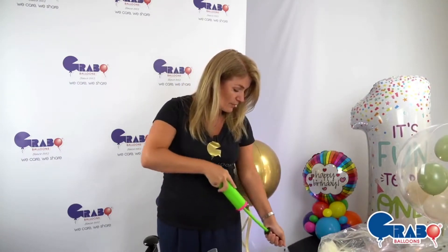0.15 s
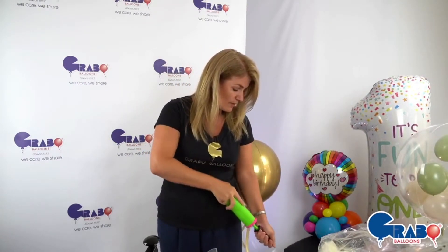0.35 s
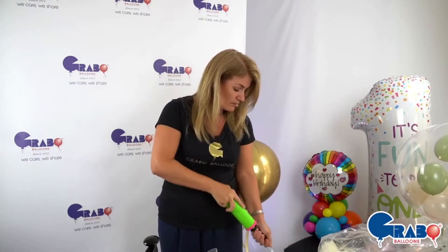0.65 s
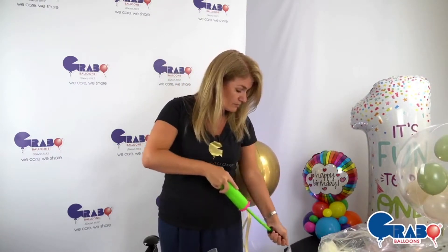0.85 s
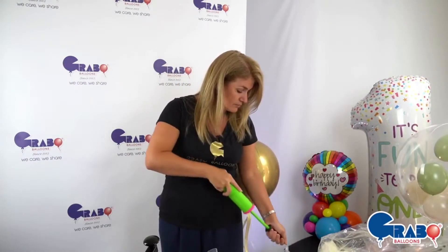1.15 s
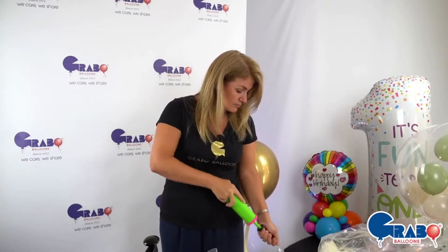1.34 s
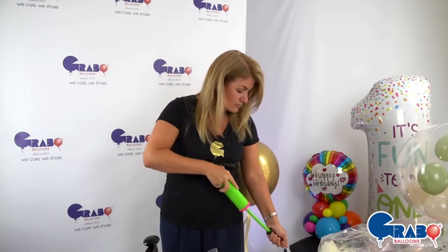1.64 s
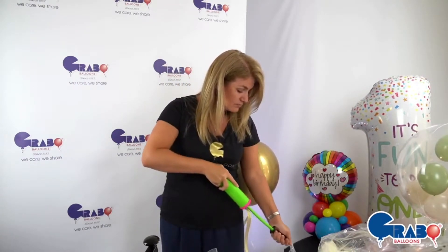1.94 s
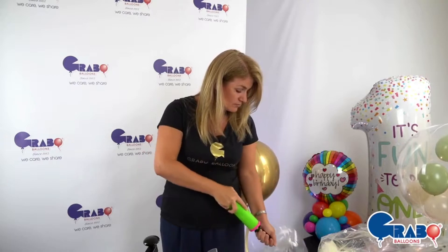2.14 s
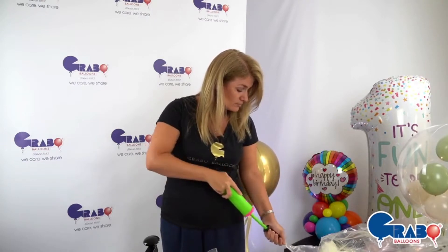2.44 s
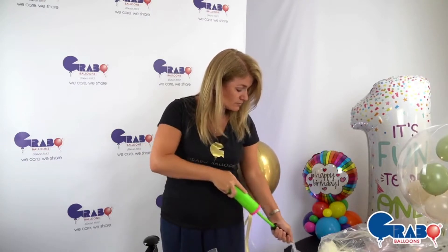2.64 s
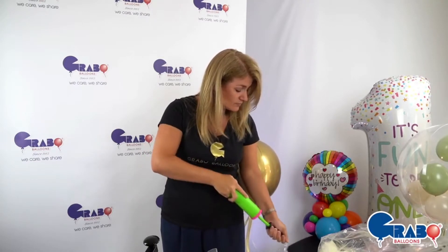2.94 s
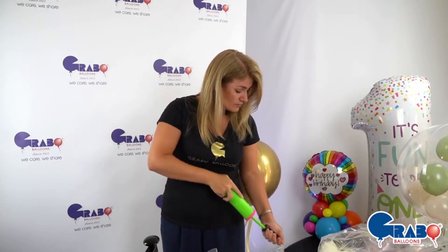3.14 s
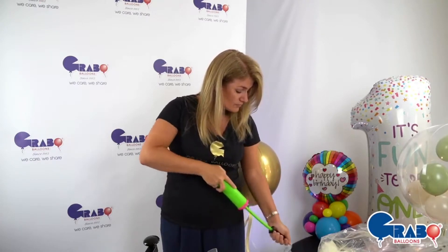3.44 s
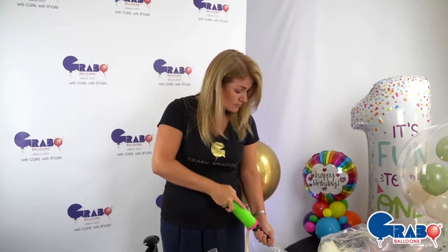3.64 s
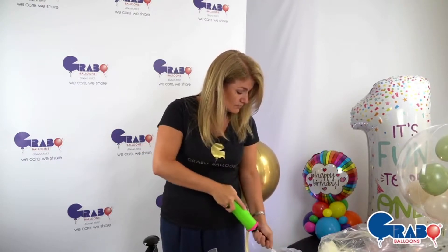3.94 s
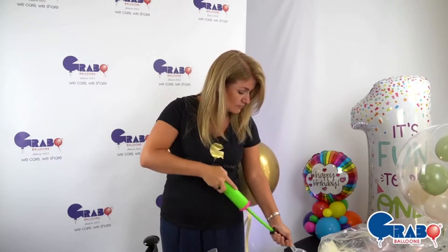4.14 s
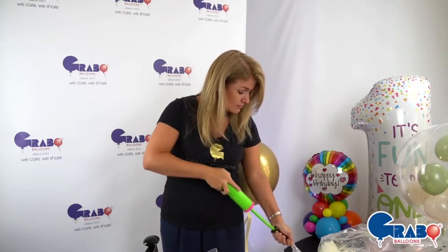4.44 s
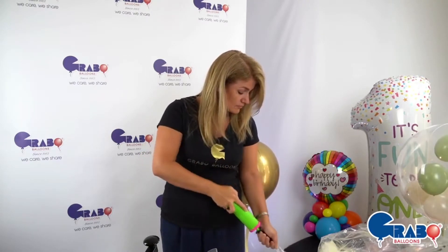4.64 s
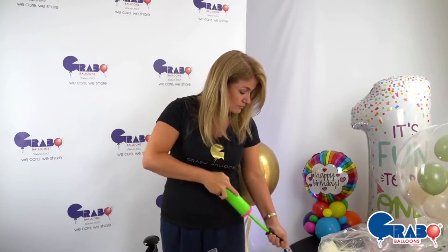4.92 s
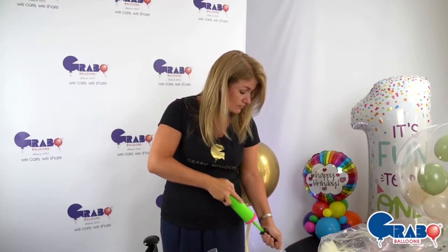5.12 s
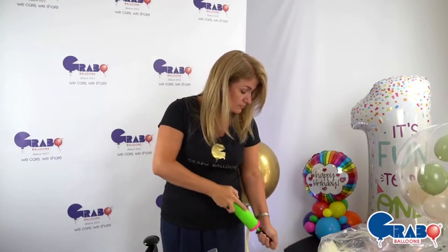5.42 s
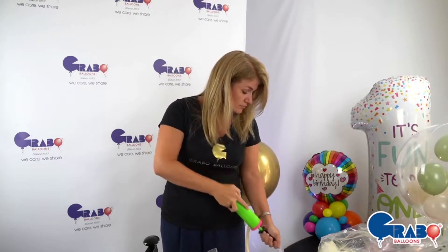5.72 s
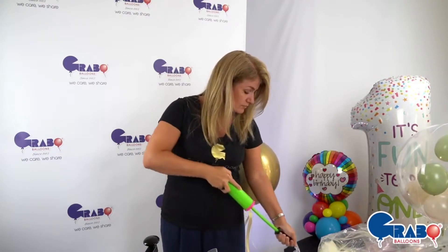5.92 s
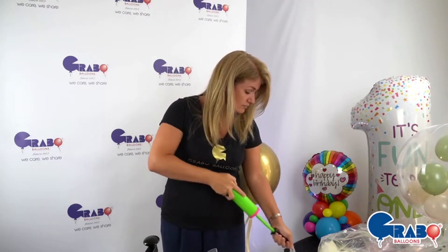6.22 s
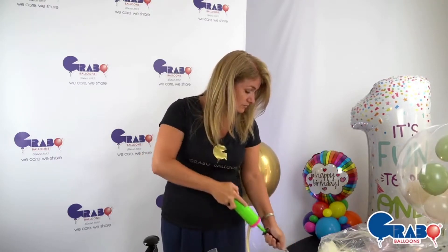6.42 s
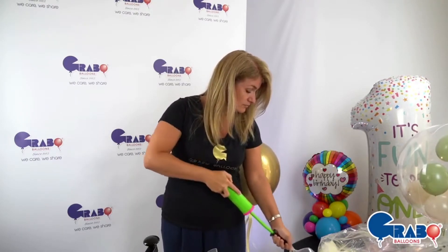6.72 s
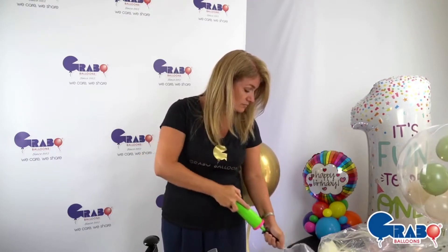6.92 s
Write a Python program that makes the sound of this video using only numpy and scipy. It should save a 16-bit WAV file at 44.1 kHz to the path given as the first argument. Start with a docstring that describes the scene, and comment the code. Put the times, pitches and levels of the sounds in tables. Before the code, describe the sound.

A plastic hand pump works close by in a small room, nearly six strokes a second. Each stroke is a rasping rush of air with light valve clicks and tocks, and some carry a thin whistle, wheeze or squeak. After about two seconds the foil balloon being filled gives a loud snap, then rustles and snaps more often as it unfolds, each snap with a brief hollow boom. The pumping never pauses.

```python
"""A small room: a plastic double-action hand pump fills a foil balloon, nearly six strokes a second.
Each stroke drives a rasping air jet through the nozzle, which whistles on some pushes.
The valves tock, click and ring as the piston turns; its seal chirps, wheezes and squeals.
The slack foil rustles and snaps out of its folds, and the air in the balloon booms along."""
import sys
import numpy as np
from scipy import signal
from scipy.fft import rfft, irfft, next_fast_len
from scipy.io import wavfile
from scipy.ndimage import uniform_filter1d, minimum_filter1d

SR = 44100
rng = np.random.default_rng(int(sys.argv[2]) if len(sys.argv) > 2 else 0)


def file_out(sig):
    """Save sig as 16-bit WAV at sys.argv[1]."""
    # one column per channel
    cols = np.atleast_2d(sig).T
    # limit, then scale
    lim = np.clip(cols, -1, 1)
    pcm = np.round(lim * 32767).astype(np.int16)
    wavfile.write(sys.argv[1], SR, pcm)


N = 311654
TIME = np.arange(N) / SR

# Handle pulled out. Each row: start, valve click and attack in seconds; air, treble and click gain in dB.
PULL_STROKES = [(-0.1, 0.031, 0.044, -0.5, 5, -12), (0.265, 0.393, 0.067, -1.5, 5.5, -15),
                (0.625, 0.742, 0.052, -1, 3.5, -13), (0.983, 1.106, 0.063, 2, 2.5, -11),
                (1.349, 1.497, 0.077, -1, 4, -6.5), (1.719, 1.894, 0.099, 1.5, 1.5, -29),
                (2.113, 2.21, 0.061, -1.5, 4.5, -30.0), (2.484, 2.619, 0.07, -6.0, 6.5, -10),
                (2.826, 2.978, 0.085, 3, -0.5, -8), (3.196, 3.321, 0.055, 2, 1, -12),
                (3.556, 3.678, 0.061, 3, -0.5, -15.5), (3.916, 4.043, 0.058, 0, 2.5, -11.5),
                (4.27, 4.383, 0.044, -3.5, 7, -11.5), (4.619, 4.741, 0.063, 3, -2, -10.5),
                (4.984, 5.108, 0.049, 1, -2, -10), (5.339, 5.471, 0.047, -1, 0.5, -9.5),
                (5.699, 5.832, 0.07, 1, -1.5, -10.5), (6.069, 6.198, 0.061, -1.5, 2.0, -9.5),
                (6.453, 6.608, 0.042, 3.5, -1.5, -29), (6.775, 6.933, 0.13, 2.5, -5.5, -11.5)]
# Handle pushed in. Each row: flap tock, valve ring and attack in seconds;
# air, treble, tock and ring gain in dB.
PUSH_STROKES = [(0.08, 0.211, 0.078, -0.5, 2, -13, -14), (0.446, 0.565, 0.074, -0.5, -0.5, -20.0, -15.5),
                (0.791, 0.916, 0.087, 1.5, -1.5, -13, -13.0), (1.172, 1.307, 0.083, -0.5, 3, -13, -11.5),
                (1.544, 1.691, 0.06, 3, -0.5, -5.5, -15.5), (1.9, 2.055, 0.11, 3.5, -1.5, -26, -12.5),
                (2.316, 2.457, 0.1, -10.5, 5.5, -23, -24.5), (2.67, 2.794, 0.075, 0, 0.5, -8, -15.5),
                (3.02, 3.146, 0.069, 1, -1, -5.5, -16.0), (3.375, 3.501, 0.087, 4, -3.5, -11.5, -15),
                (3.754, 3.876, 0.095, -2.5, -9.5, -18.5, -20), (4.089, 4.206, 0.062, -1.0, 1, -12.5, -14),
                (4.442, 4.556, 0.082, 1, 0.5, -10.5, -15.5), (4.81, 4.929, 0.057, 3, -4, -8, -12.5),
                (5.181, 5.299, 0.069, 1.0, 2, -9, -13), (5.539, 5.659, 0.057, 0.5, -1.5, -8.5, -12.5),
                (5.896, 6.01, 0.058, 1.5, 0, -7, -10.5), (6.261, 6.391, 0.089, -0.5, 2, -6.5, -16.5),
                (6.639, 6.765, 0.095, 2, -14, -18, -23), (7.011, 7.147, 0.062, 5.5, -7, -8.5, -14.0)]
# Rustle of the unfolding foil. Each row: time in seconds, gain in dB.
FOIL_ENVELOPE = [(0.0, -59), (0.81, -62), (2.09, -49), (2.36, -62), (3.01, -39), (3.4, -63.5),
                 (4.23, -37.5), (4.45, -57.5), (5.63, -43.5), (6.22, -63.5), (7.07, -34)]
# Foil rustle and snap tails. Each row: frequency in Hz, relative density in dB.
FOIL_SPECTRUM = [(40, -41), (95, -6), (170, -9), (240, 4), (300, 4.5), (400, 7), (520, -4), (900, -6),
                 (2000, -17), (6000, -51)]


def stroke(start, end, attack_s, sag_db_per_s, release_db_per_s):
    """Air flow of one stroke: swells, sags as the arm slows, dies as the valve shuts."""
    swell = np.sin(np.pi / 2 * np.clip((TIME - start) / attack_s, 0, 1)) ** 2
    sag_db = sag_db_per_s * np.maximum(TIME - start - attack_s, 0)
    release_db = release_db_per_s * np.maximum(TIME - end, 0)
    return swell * from_db(-sag_db - release_db)


def pull_flow(gain_db=-20, let_go_s=0.0023):
    """A pull peaks early and fades quickly."""
    flow = np.zeros(N)
    for start, end, attack_s, db, *_ in PULL_STROKES:
        shape = stroke(start, end - let_go_s, attack_s, sag_db_per_s=95.5, release_db_per_s=148)
        flow += from_db(gain_db + db) * shape
    return flow


def push_flow(gain_db=-20, lead_s=0.016, let_go_s=0.023):
    """A push starts just before the flap opens and holds its strength longer."""
    flow = np.zeros(N)
    for start, end, attack_s, db, *_ in PUSH_STROKES:
        shape = stroke(start - lead_s, end - let_go_s, attack_s, sag_db_per_s=38, release_db_per_s=174.5)
        flow += from_db(gain_db + db) * shape
    return flow


def air_jet(flow, body_db, gain_db=-4, hollow_db=1.92, shifts_per_s=16):
    """Nozzle turbulence follows the flow; hollow patches shift through it."""
    # Each row: frequency in Hz, relative density in dB.
    jet_spectrum = [(60, -34), (170, -20.5), (330, -10.5), (600, -2.5), (950, -1.5), (1250, 1.5),
                    (1800, 1.5), (2700, -2), (4000, -5), (6500, -8.5), (8200, -12.5), (10500, -22),
                    (14500, -27), (16000, -44)]
    jet = flow * from_db(gain_db) * noise(jet_spectrum)
    edges_hz = np.geomspace(500, 9000, 13)
    for low, high in zip(edges_hz, edges_hz[1:]):
        jet = boost(jet, hollow_db * drift(shifts_per_s), [low, high], "band")
    jet = boost(jet, body_db, 1040, "low")
    # each stroke holds its own brightness
    strokes = list(PULL_STROKES) + list(PUSH_STROKES)
    treble = sorted((s, db) for start, end, _, _, db, *_ in strokes for s in (start, end))
    return boost(jet, over_time(treble), 4400, "high")


def valves(click_db=5.5, ring_db=1.36, tock_db=-3.5, turn_s=0.04, turn_fade_db_per_s=3.5):
    """Light flaps with little bass: they tock open, click shut after a pull, ring shut after a push."""
    # Each row: mode frequency in Hz, gain in dB, T60 in seconds.
    click_modes = [(3063, 4, 0.0061), (1840, 6, 0.0026), (1685, 0, 0.0068), (322, -12, 0.0092),
                   (6660, -5.5, 0.0041)]
    ring_modes = [(1137, -0.5, 0.063), (2174, -8.5, 0.063), (241, -4.5, 0.037), (412, -11.5, 0.045),
                  (1290, -53, .02), (3110, -3.5, 0.0083)]
    tock_modes = [(1394, 0, 0.012), (650, 5.5, 0.003), (298, -1, 0.0073)]
    # Piston knocking in the barrel. Each row: time in seconds, gain in dB.
    piston_knocks = [(1.896, 0), (1.908, 2.5), (4.289, -4.5)]
    pull_ends = [(s, db) for _, s, *_, db in PULL_STROKES]
    push_ends = [(s, db) for _, s, *_, db in PUSH_STROKES]
    openings = [(s, db) for s, *_, db, _ in PUSH_STROKES]
    # the flap turns over after each push, softer as the balloon fills
    turns = [(s + turn_s, db + 0.5 - turn_fade_db_per_s * s) for s, db in push_ends]
    clicks = butter(strike(pull_ends, click_modes, scatter_db=0.1), 3930, "low")
    rings = butter(strike(push_ends, ring_modes, scatter_db=2.77), 3400, "low")
    tocks = strike(openings + turns + piston_knocks, tock_modes, scatter_db=0.9)
    tocks = butter(tocks, [300, 2000], "band")
    flaps = from_db(click_db) * clicks + from_db(ring_db) * rings + from_db(tock_db) * tocks
    return butter(flaps, 215, "high")


def valve_crack(gain_db=4, hardness=2.1):
    """Bright edge of the valve clicks; grows faster than the blow."""
    impulses = np.zeros(N)
    for _, s, *_, db in PULL_STROKES:
        impulses[int(s * SR)] = from_db(gain_db + hardness * db)
    return butter(ring(impulses, hz=7500, t60_s=0.0025), 4500, "high", order=1)


def foil_snaps(swell_cycles=0.77, swing_db=-7, crackle_db=6, crackle_s=0.003, tail_db=1.5, t60_s=0.12):
    """A fold flips with a swing or two and a crackle; the skin shudders on, the enclosed air booms."""
    # Each row: time in seconds, snap gain in dB, pitch in Hz, tail and boom gain in dB.
    folds = [(2.197, 11.5, 320, -12.5), (2.214, -8, 700, -27), (2.929, -14, 1330, -28.5),
             (2.960, -5.5, 1090, -23.5), (3.68, -2, 590, -18.5), (4.012, -4, 1060, -22),
             (4.132, 3, 910, -15.5), (4.331, -13, 707, -33), (4.503, -2, 790, -27), (4.666, -3.5, 745, -21),
             (4.827, -10.5, 422, -18), (5.055, -5, 990, -24.5), (5.396, 3.5, 816, -16.5),
             (5.576, 2, 880, -23.5), (5.804, -4.5, 1050, -27), (6.551, 1.5, 1360, -19),
             (6.677, -6.5, 410, -21.5), (6.918, -4.5, 775, -23)]
    # Skin and enclosed air. Each row: mode frequency in Hz, gain in dB, T60 in seconds.
    balloon_modes = [(291, -0.5, 0.16), (397, -7.5, 0.15), (687, -16, 0.2), (930, -16, 0.19)]
    out, t = np.zeros(N + SR), np.arange(SR // 4) / SR
    shudder = noise(FOIL_SPECTRUM)
    for s, db, hz, boom_db in folds:
        age = t * hz / swell_cycles
        swing = np.sin(2 * np.pi * hz * t) * (age * np.exp(1 - age)) ** 2
        crackle = butter(rng.standard_normal(len(t)), [250, 1.73 * hz], "band") * np.exp(-t / crackle_s)
        snap = from_db(swing_db) * swing + from_db(crackle_db) * crackle
        offset = rng.integers(N - len(t))
        tail = shudder[offset:offset + len(t)] * from_db(-60 * t / t60_s) * np.minimum(age / 2, 1)
        at = int((s - swell_cycles / hz / 2) * SR)
        out[at:at + len(t)] += from_db(db) * snap + from_db(boom_db + tail_db) * tail
    boom = strike([(s, db) for s, _, _, db in folds], balloon_modes, scatter_db=4.5)
    return butter(out[:N] + boom, 60, "high", order=1)


def creases(flow, per_s, spread_db, range_db):
    """Impulses of creases giving way; their rate follows the flow and is per_s at rms flow."""
    fires = rng.random(N) < per_s * rms_one(flow) / SR
    size_db = np.minimum(spread_db * rng.exponential(1, N), range_db)
    return fires * from_db(size_db) * rng.choice([-1, 1], N)


def foil_rustle(flow, gain_db=5):
    """Dense grains from tiny creases."""
    grains = shaped(creases(flow, per_s=500, spread_db=7, range_db=28), gain_curve(FOIL_SPECTRUM))
    return from_db(gain_db + over_time(FOIL_ENVELOPE)) * rms_one(grains)


def foil_crinkle(flow, gain_db=1):
    """Sparse, dry ticks from small creases, swelling with the rustle."""
    ticks = butter(creases(flow, per_s=45, spread_db=11, range_db=33), [600, 2200], "band")
    return from_db(gain_db + over_time(FOIL_ENVELOPE)) * rms_one(ticks)


def seal_wheeze():
    """Air slips past the seal on some pushes: a hollow, falling tone."""
    # Each row: start in seconds, level in dB.
    leaks = [(.08, -27.5), (.45, -34), (.80, -30), (1.545, -23.5), (1.905, -25.5), (2.675, -32),
             (3.005, -27), (3.37, -34), (4.07, -36), (5.17, -30.5), (5.945, -27)]
    return glides(leaks, length_s=0.085, from_hz=3320, to_hz=3020, half_width_hz=210)


def seal_squeals():
    """The sticking seal gives gliding tones with an octave overtone."""
    # Each row: start and end in seconds; first pitch, last pitch and half-width in Hz;
    # level and relative overtone level in dB.
    squeals = [(2.34, 2.484, 3330, 2215, 221, -33, -6), (4.294, 4.315, 1194, 1230, 25, -17, -8.5),
               (5.978, 5.999, 3080, 3040, 40, -24.5, -25), (6.338, 6.372, 1380, 1320, 170, -19.5, -13)]
    out = np.zeros(N)
    for start, end, first_hz, last_hz, half_width_hz, db, overtone_db in squeals:
        on = (TIME > start) & (TIME < end)
        hz = np.linspace(first_hz, last_hz, on.sum())
        tone = airy(hz, half_width_hz) + from_db(overtone_db) * airy(2 * hz, 2 * half_width_hz)
        out[on] += from_db(db) * np.sqrt(np.hanning(len(hz))) * tone
    return out


def seal_chirps(level_db=-33, scatter_db=2, lead_s=0.022, length_s=0.014, from_hz=2000, to_hz=3700):
    """The seal gives a tiny rising chirp as each push sets off."""
    out, t = np.zeros(N + SR), np.arange(int(length_s * SR)) / SR
    chirp = signal.chirp(t, from_hz, length_s, to_hz) * np.hanning(len(t))
    for s, *_ in PUSH_STROKES:
        at = int((s - lead_s) * SR)
        out[at:at + len(t)] += from_db(level_db + scatter_db * rng.standard_normal()) * chirp
    return out[:N]


def nozzle_whistle(gain_db=-2.5):
    """A thin, airy edge tone on some pushes."""
    # Each row: start in seconds, gain in dB.
    whistles = [(.085, -28), (.47, -28.5), (.805, -28.5), (1.17, -37), (1.55, -34), (3.02, -33),
                (3.385, -35), (3.755, -36), (5.2, -34), (6.27, -34), (7.03, -24)]
    return from_db(gain_db) * glides(whistles, length_s=0.08, from_hz=8050, to_hz=8010, half_width_hz=34)


def room(x, t60_s=0.2, wall_hz=6400, gap_s=0.004):
    """A diffuse tail, dulled by the walls."""
    t = np.arange(SR * 3 // 4) / SR
    decay = from_db(-60 * t / t60_s)
    tail = butter(rng.standard_normal(len(t)), wall_hz, "low", order=1) * decay * (t > gap_s)
    return signal.fftconvolve(x, tail / np.sqrt(np.sum(decay ** 2)))[:N]


def room_hush(level_db=-43):
    """Steady noise of the still room."""
    # Each row: frequency in Hz, relative density in dB.
    hush_spectrum = [(30, -34), (100, -28), (300, 12.5), (1200, -22), (3000, 11.5), (7000, 0), (10500, -13),
                     (15000, -13)]
    return from_db(level_db) * noise(hush_spectrum)


def strike(hits, modes, scatter_db):
    """Each hit (s, dB) rings every mode with a strength of its own."""
    s, db = np.transpose([hit for hit in hits if hit[0] < TIME[-1]])
    offsets_db = scatter_db * rng.standard_normal((len(s), len(modes)))
    out = np.zeros(N)
    for k, (hz, mode_db, t60_s) in enumerate(modes):
        impulses = np.zeros(N)
        impulses[(s * SR).astype(int)] = from_db(db + mode_db + offsets_db[:, k])
        out += (-1) ** k * ring(impulses, hz, t60_s)
    return out


def ring(drive, hz, t60_s):
    """One mode: a unit impulse starts a decaying sine of height 1."""
    radius, angle = from_db(-60 / (t60_s * SR)), 2 * np.pi * hz / SR
    return signal.lfilter([0, np.sin(angle)], [1, -2 * radius * np.cos(angle), radius ** 2], drive + 1e-18)


def glides(events, length_s, from_hz, to_hz, half_width_hz):
    """Breathy tones (start s, dB) that swell and fade while their pitch slides."""
    out, hz = np.zeros(N + SR), np.linspace(from_hz, to_hz, int(length_s * SR))
    for start, db in events:
        at = int(start * SR)
        out[at:at + len(hz)] += from_db(db) * np.sqrt(np.hanning(len(hz))) * airy(hz, half_width_hz)
    return out[:N]


def airy(hz, half_width_hz):
    """Narrow-band turbulence around a moving pitch, rms 1."""
    phase = 2 * np.pi * np.cumsum(hz) / SR
    a, b = butter(rng.standard_normal((2, len(hz))), half_width_hz, "low")
    return rms_one(a * np.sin(phase) + b * np.cos(phase))


def noise(spectrum):
    """Noise with a (Hz, dB) spectrum, rms 1."""
    return rms_one(shaped(rng.standard_normal(N), gain_curve(spectrum)))


def drift(per_s):
    """Straight lines between random knots, rms 1."""
    knots = rng.standard_normal(8192)
    return rms_one(np.interp(TIME * per_s, np.arange(len(knots)), knots))


def over_time(points):
    """A (s, dB) table as dB per sample."""
    return np.interp(TIME, *np.transpose(points))


def gain_curve(points):
    """A (Hz, dB) table as a gain per bin of a double-length transform."""
    hz, db = np.transpose(points)
    grid_hz = np.linspace(1, SR / 2, next_fast_len(N) + 1)
    return from_db(np.interp(np.log(grid_hz), np.log(hz), db))


def shaped(x, gain):
    """Filter by a gain curve."""
    size = 2 * next_fast_len(N)
    return irfft(rfft(x, size) * gain, size)[:N]


def boost(x, db, hz, kind):
    """First-order shelf or bell."""
    return x + (from_db(db) - 1) * butter(x, hz, kind, order=1)


def butter(x, hz, kind, order=2):
    """Causal Butterworth filter."""
    return signal.sosfilt(signal.butter(order, hz, kind, fs=SR, output="sos"), x + 1e-18)


def from_db(db):
    """Decibels to gain."""
    return 10 ** (np.asarray(db) / 20)


def rms_one(x):
    """Scale to rms 1."""
    return x / np.sqrt(np.mean(x ** 2) + 1e-20)


def scene(rasp_db=1.7, air_room_db=-7.5, impact_room_db=-10.5, impact_side_db=1.5):
    """Pump and balloon close by; left and right differ mainly in the treble."""
    # Each row: frequency in Hz, side gain in dB.
    stereo_width = [(60, -15), (200, -34.5), (400, -36), (1300, -39.5), (2400, -15.5), (4400, -3.5),
                    (8000, -12.5), (15000, -8.5)]
    # Slightly more treble on the right. Each row: frequency in Hz, left minus right in dB.
    balance = [(700, 0), (1300, -.5), (2600, -2), (4500, -1.2), (8000, -1.2), (15000, -.2)]
    pull, push = pull_flow(), push_flow()
    push_share = push / (pull + push + 1e-9)
    # the jet gains body as the balloon fills, and has more on a pull
    body_db = push_share * np.linspace(-5, 0.5, N) + (1 - push_share) * np.linspace(0.5, 1, N)
    flow = (pull + push) * from_db(rasp_db * drift(per_s=110))   # the seal drags unevenly
    impacts = (valves() + valve_crack() + seal_chirps()
               + foil_snaps() + foil_rustle(flow) + foil_crinkle(flow))
    air_pair = [air_jet(flow, body_db) + seal_wheeze() + seal_squeals() + nozzle_whistle()
                for _ in range(2)]
    mid, side = [air + from_db(air_room_db) * room(air) + room_hush() for air in air_pair]
    mid = mid + impacts + from_db(impact_room_db) * room(impacts)
    side = shaped(side + from_db(impact_side_db) * room(impacts), gain_curve(stereo_width))
    left_gain = np.sqrt(gain_curve(balance))
    return np.array([shaped(mid + side, left_gain), shaped(mid - side, 1 / left_gain)])


def record(dry):
    """Fast limiter on the loudest snaps, then a steep low-pass."""
    ceiling, hold_samples, cutoff_hz = 0.93, 89, 15800
    gain = np.minimum(1, ceiling / (np.abs(dry).max(axis=0) + 1e-9))
    gain = uniform_filter1d(minimum_filter1d(gain, hold_samples), hold_samples)
    return signal.sosfilt(signal.ellip(10, 0.1, 80, cutoff_hz, fs=SR, output="sos"), dry * gain)


dry = scene()
out = record(dry)
file_out(out)
```